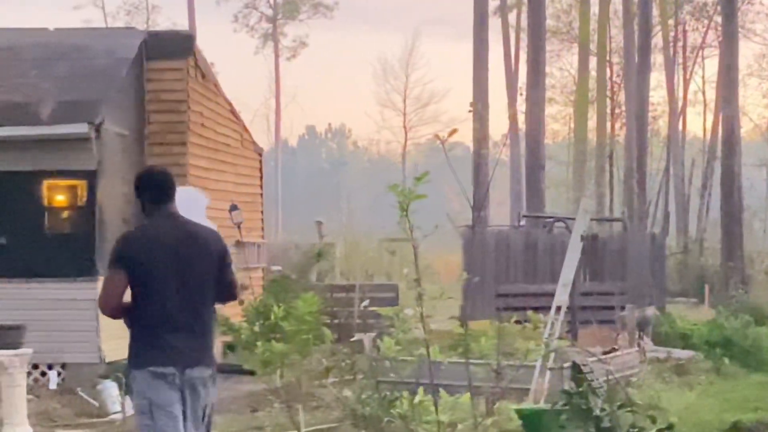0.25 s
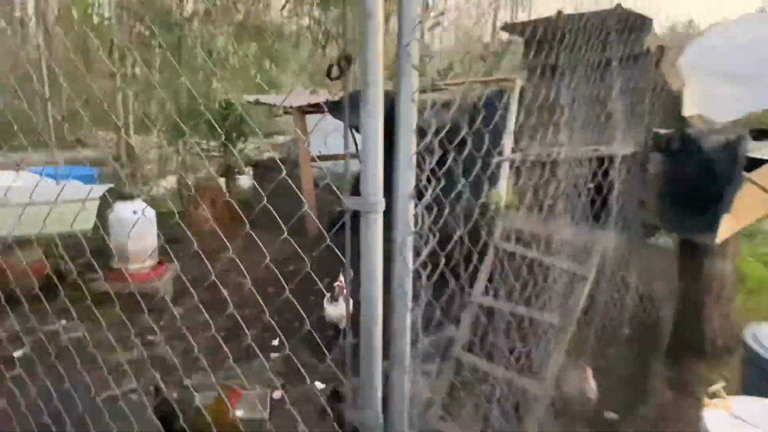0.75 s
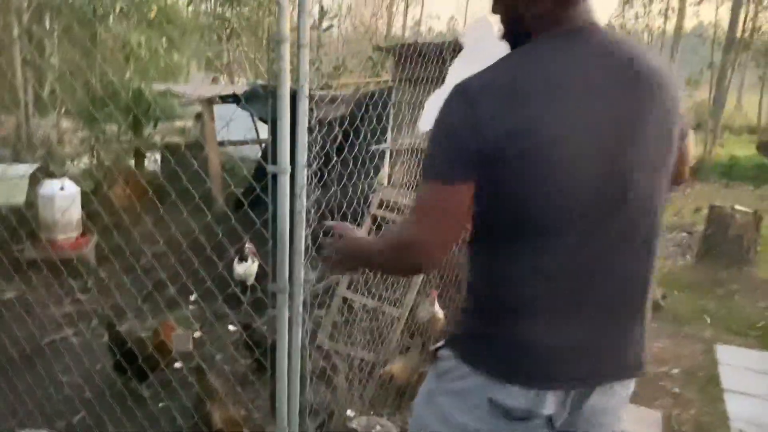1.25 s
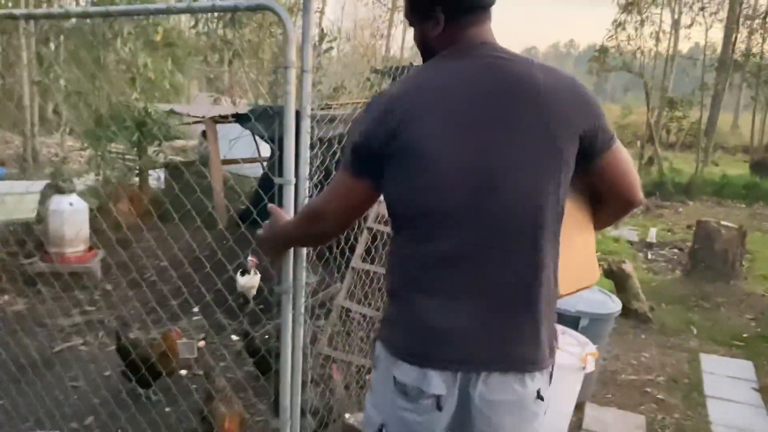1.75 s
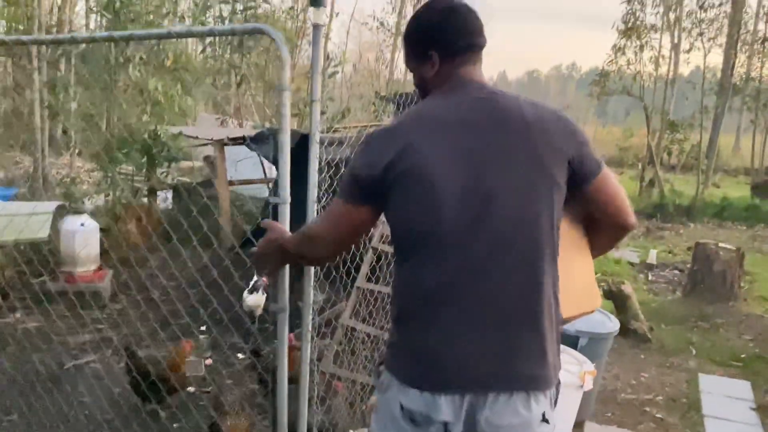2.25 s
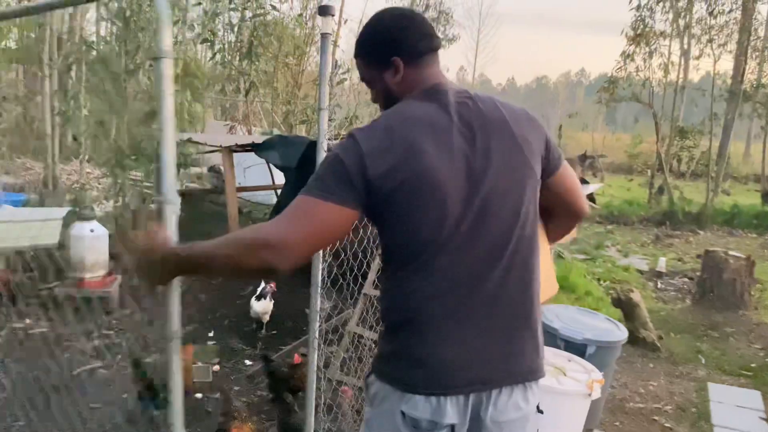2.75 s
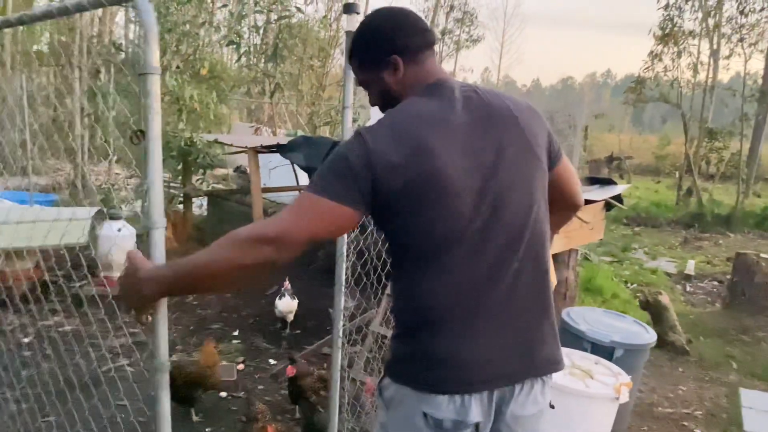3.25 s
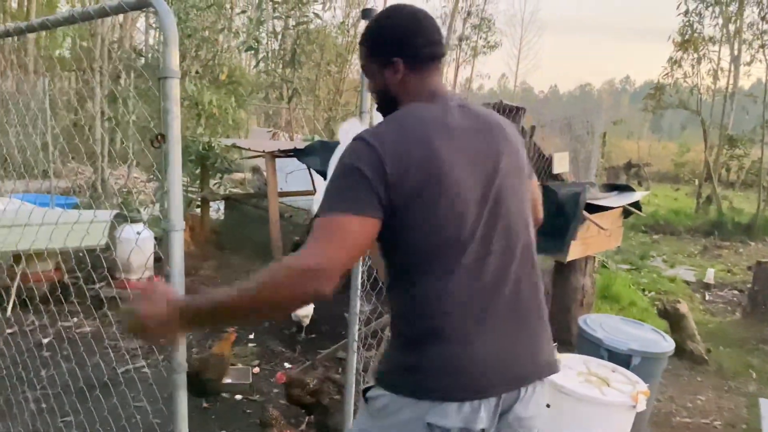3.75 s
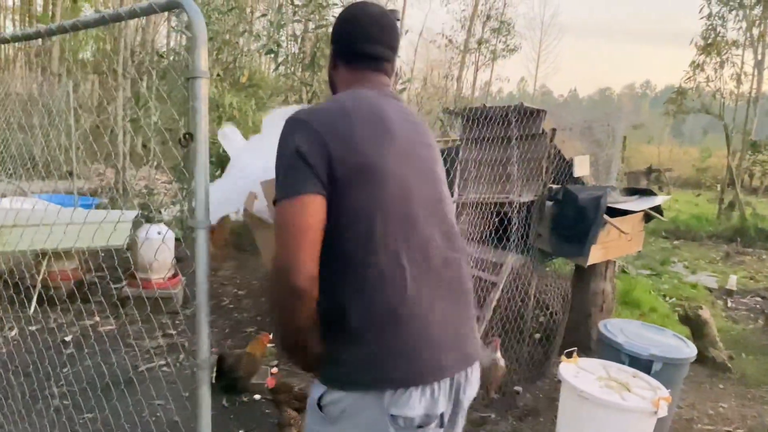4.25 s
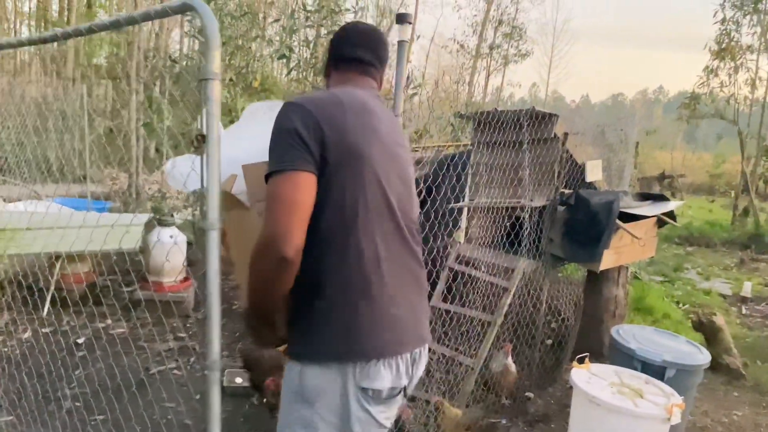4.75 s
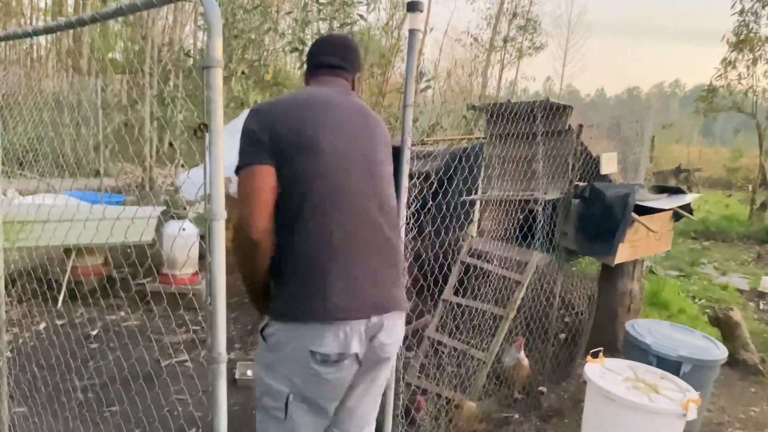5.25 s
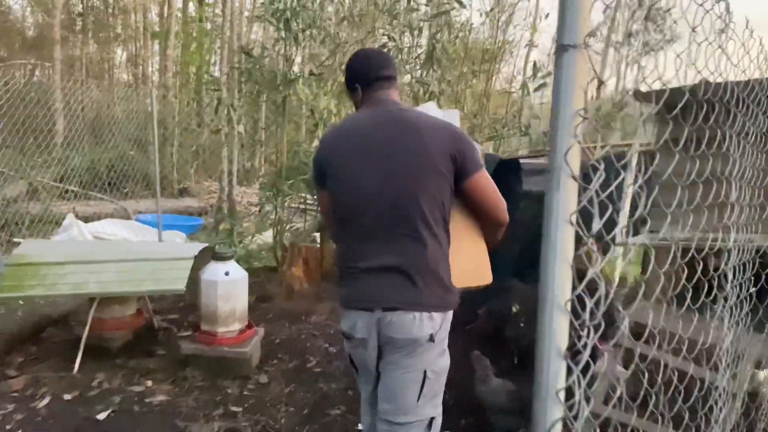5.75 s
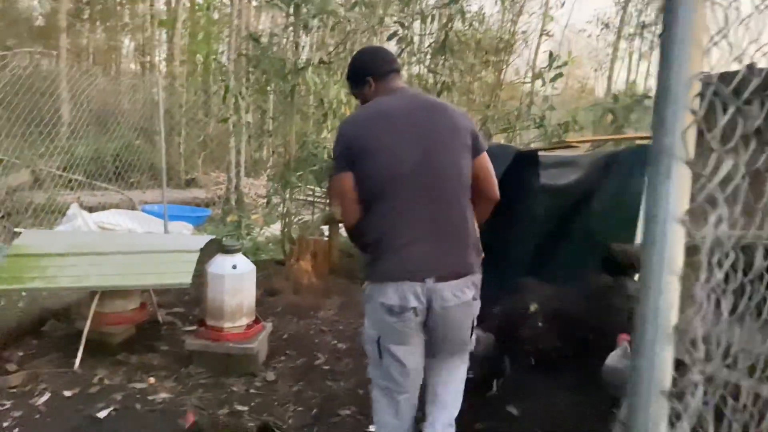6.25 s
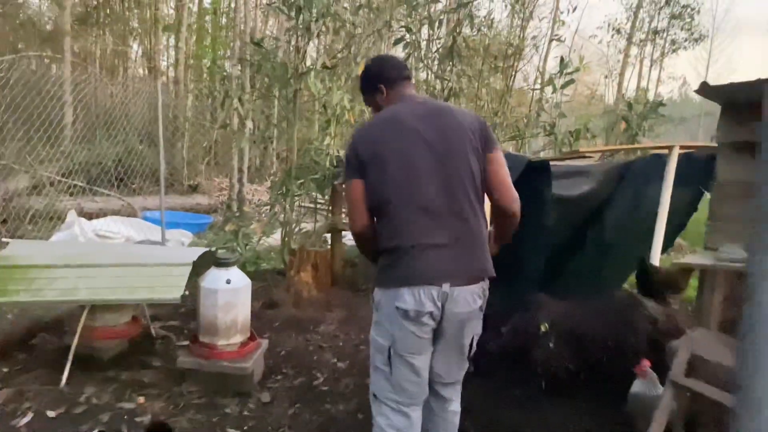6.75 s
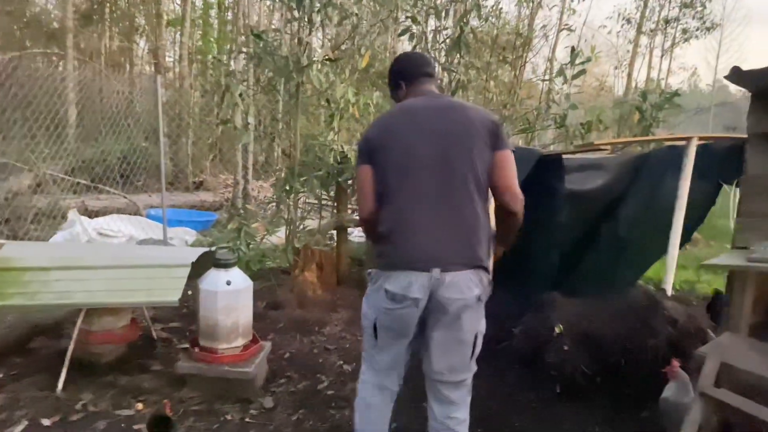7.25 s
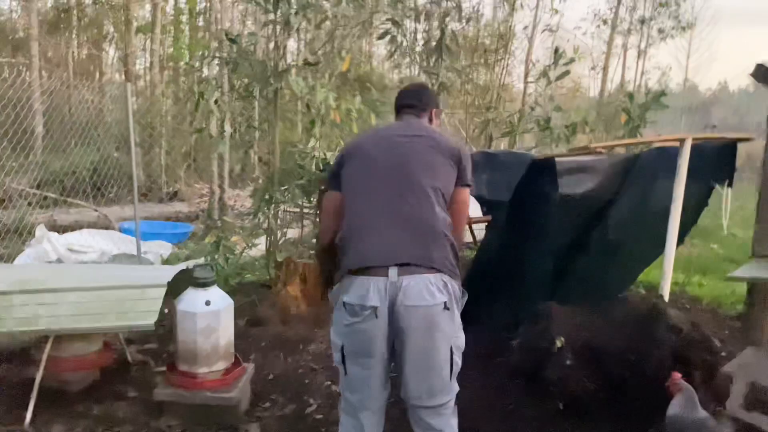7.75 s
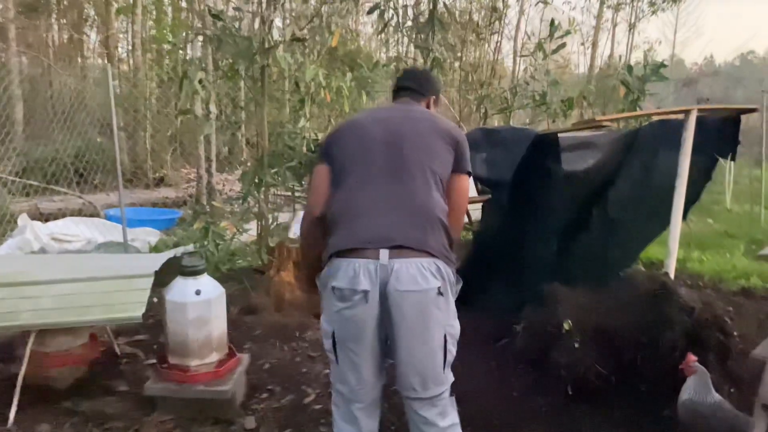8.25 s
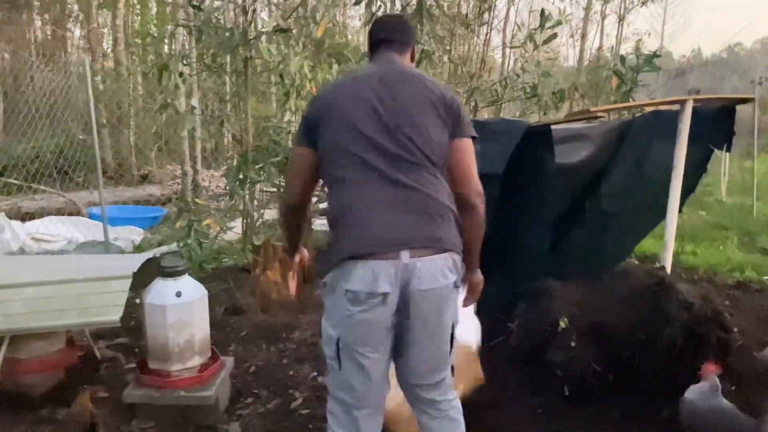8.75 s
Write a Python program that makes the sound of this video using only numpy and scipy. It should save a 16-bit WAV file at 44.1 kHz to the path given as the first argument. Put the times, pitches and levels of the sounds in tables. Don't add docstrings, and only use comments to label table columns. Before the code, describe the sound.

Hens give low clucks and drawn-out rising moans in an outdoor run while plastic crinkles, wire ticks, a bird whistles and a box thumps down.

```python
import sys
import numpy as np
from scipy import signal
from scipy.fft import rfft, irfft
from scipy.io import wavfile
from scipy.ndimage import uniform_filter1d

SR = 44100
rng = np.random.default_rng(int(sys.argv[2]) if len(sys.argv) > 2 else 0)


def elevation(decibels):
    levels = np.asarray(decibels, float)
    return 10 ** (levels / 20)


def put_to_file(sound):
    columns = np.atleast_2d(sound).T
    safe = np.clip(columns, -1, 1)
    whole_steps = np.round(safe * 32767)
    wavfile.write(sys.argv[1], SR, whole_steps.astype(np.int16))


N = 396900
TIME = np.arange(N) / SR

# from t/s, traffic level/dB, air level/dB, insect level/dB
SPOTS = [
    (0, -52, -62, -66.5),
    (.4, -66, -60, -73),
    (1.15, -51, -61, -72),
    (5.457, -50, -59.5, -72),
]
# t/s, level/dB
MOTION = [(0, -73), (.3, -79.5), (1.1, -76), (2.1, -73), (2.7, -72), (3.1, -65), (3.9, -67.5), (4.64, -72),
          (5.3, -68.5), (5.75, -69), (6.4, -65), (7.2, -70), (7.9, -69.5), (9, -67)]


def rms_one(x):
    return x / np.sqrt(np.mean(x ** 2) + 1e-20)


def in_time(rows):
    s, *columns = np.transpose(rows)
    return [np.interp(TIME, s, c) for c in columns]


def at_hz(points, hz):
    points = np.array(points)
    return np.interp(np.log(hz), np.log(points[:, 0]), points[:, 1])


def drift(rate_hz):
    r = np.exp(-80 * np.pi * rate_hz / SR)
    white = rng.standard_normal(N // 40 + 2002)
    slow = rms_one(signal.lfilter([1], [1, -2 * r, r * r], white)[2000:])
    return np.interp(np.arange(N) / 40, np.arange(len(slow)), slow)


def gate(start, end, edge):
    return np.sin(np.pi / 2 * np.clip(np.minimum(TIME - start, end - TIME) / edge + .5, 0, 1)) ** 2


def bandpass(x, band_hz):
    return signal.sosfilt(signal.butter(2, band_hz, "band", fs=SR, output="sos"), x)


def ring(clicks, hz, t60):
    r, w = elevation(-60 / (t60 * SR)), 2 * np.pi * hz / SR
    return signal.lfilter([0, np.sin(w)], [1, -2 * r * np.cos(w), r * r], clicks + 1e-18)


def place(x, pan_db, lead):
    left = np.interp(np.arange(N) + lead, np.arange(N), x)
    return np.array([left * elevation(pan_db / 2), x * elevation(-pan_db / 2)])


def banded(white, spectrum, patchy_db, tilt=None):
    # f/Hz, likeness [0-1]
    likeness = [(30, 0.71), (70, 0.97), (300, 0.52), (700, 0.36), (2500, 0.4), (4500, 0.45), (6500, 0.75),
                (9000, 0.9)]
    bottom, top = spectrum[0][0], spectrum[-1][0]
    edges = np.geomspace(bottom, top, 2 + int(2 * np.log2(top / bottom)))
    out, power = 0, 0
    for k, (low, high) in enumerate(zip(edges, edges[1:])):
        mid, side = bandpass(white[k % 2], [low, high])
        hz = np.sqrt(low * high)
        alike = np.clip(at_hz(likeness, hz), -1, 1)
        stereo = np.sqrt(1 + alike) * mid + np.sqrt(1 - alike) * side * [[1], [-1]]
        band = elevation(at_hz(spectrum, hz) + patchy_db * drift(12)) * stereo
        power += np.mean(band ** 2)
        out = out + band * (elevation(tilt(hz)) if tilt else 1)
    return out / np.sqrt(power)


def hens():
    # t/s, pitch f/Hz, effort level/dB, beak opening [0-1]
    clucks = [
        [(0.76, 900, -63, .3), (0.823, 942, -68.5, .34), (0.875, 922, -71, .33)],
        [(0.965, 340.4, -63, .08), (1.046, 317.6, -52, .35), (1.12, 309.5, -62, .35)],
        [(1.26, 341, -75, .1), (1.36, 384.2, -77, .17)],
        [(5.463, 1020, -80, .45), (5.48, 1030, -65, .45), (5.553, 1055, -65, .45)],
        [(7.09, 314.8, -77, .35), (7.12, 320.5, -52, .36), (7.135, 320.4, -70, .3)],
        [(8.07, 283.8, -61, .25), (8.152, 276.7, -60, .24), (8.18, 271.3, -65, .4)],
    ]
    drawls = [
        [(1.41, 696, -72, .35), (1.438, 681, -64, .53), (1.562, 720, -56, .72), (1.82, 743, -52, .78),
         (1.85, 721, -54, .85), (2.13, 765.5, -48.5, .92), (2.157, 654, -57, .72)],
        [(7.23, 314.8, -60, .1), (7.239, 316, -61, .2), (7.275, 379.3, -58.5, .24), (7.559, 386.3, -57.5, .21),
         (7.603, 400, -57, .2), (7.915, 410, -57, .22), (7.94, 400, -61, .18)],
    ]
    first_moan = [
        [(3.465, 321, -60, .36), (3.5, 330, -58, .36), (3.53, 356, -64, .1), (3.6, 372, -63, .12),
         (3.645, 412, -56, .2), (3.7, 414, -55, .2), (3.75, 390, -58, .12), (3.86, 379, -59, .15),
         (3.935, 366, -58, .32)],
        [(3.935, 370, -58, .33), (4.06, 405, -54, .41), (4.13, 393, -53, .4), (4.2, 386, -54, .4),
         (4.297, 410, -54, .43), (4.405, 396, -53.5, .41), (4.42, 424, -51, .45), (4.46, 422, -51, .45),
         (4.495, 440, -50, .2)],
    ]
    last_moan = [
        (8.28, 280.4, -66, 1),
        (8.34, 297, -68, .1),
        (8.4, 316.5, -60, .17),
        (8.46, 340, -60, .22),
        (8.5, 311, -60, .17),
        (8.57, 360, -58, .45),
        (8.582, 402, -57, .4),
        (8.615, 398, -56, .4),
        (8.64, 320, -57, .4),
    ]
    # L-R level/dB, left lead/samples, tremble share [0-1], loss per harmonic/dB, windpipe width f/Hz
    places = [(4, -14, 0.0079, 15, 200), (4.5, 6.5, 0.017, 6.5, 150), (-3, 4, .012, 6, 200),
              (-7.5, -7.6, 0.022, 15, 200), (-4, 8.5, .02, 4.5, 150), (4, 2, 0.0206, 9, 120),
              (-4, -3.4, .0075, 16, 270), (2.5, 1.5, .008, 4, 220), (1.1, -.6, 0.012, 7, 210),
              (1.1, -.6, 0.017, 4.5, 230), (-4.5, -15, .026, 3, 250)]
    # start t/s, end t/s, f/Hz, level/dB
    flips = [(4.07, 4.107, 980, -44.5), (4.278, 4.292, 906, -42.5), (4.467, 4.51, 1019, -39),
             (7.611, 7.64, 952, -46), (7.689, 7.706, 933, -43.5), (7.736, 7.746, 855, -45),
             (7.755, 7.799, 940, -40), (7.811, 7.844, 961, -39), (7.857, 7.87, 929, -39),
             (7.878, 7.893, 960, -35.5), (7.91, 7.92, 957, -39)]
    rasp_hz = [880, 1020]
    pipe_shut_hz, pipe_open_hz, pipe_lift_db = 600, 1600, 20
    fourth_db, fifth_db = -12, -22
    rasp_db = 36
    port_lead = 4

    flipped, flip_hz, flip_gain = np.zeros((3, N))
    for start, end, hz, level_db in flips:
        share = gate(start, end, .01)
        flipped += share
        flip_hz += share * hz / 2
        flip_gain += share * elevation(level_db)

    out = np.zeros((2, N))
    tremble = drift(29) + 0.745 * drift(136)
    flutter = [elevation((.8 + .7 * k) * drift(40)) for k in range(4)]
    rasp = rms_one(bandpass(rng.standard_normal(N), rasp_hz))
    calls = clucks + drawls + first_moan + [last_moan]
    for call, (pan_db, lead, unsteady, loss_db, width_hz) in zip(calls, places):
        pitch_hz, effort_db, opening = in_time(call)
        pipe_hz = pipe_shut_hz + opening * (pipe_open_hz - pipe_shut_hz)
        sung_hz = (pitch_hz * (1 - flipped) + flip_hz) * (1 + unsteady * tremble)
        phase = 2 * np.pi * np.cumsum(sung_hz) / SR
        gains = []
        for k, flip_loss in enumerate([.78, 1, .87, .87]):
            lift_db = pipe_lift_db / (1 + (((k + 1) * pitch_hz - pipe_hz) / width_hz) ** 2)
            gains.append(elevation(effort_db - k * loss_db + lift_db) * (1 - flip_loss * flipped))
        gains[1] = gains[1] + flip_gain
        gains[3] = gains[3] * elevation(fourth_db)
        voice = sum(g * flutter[k] * np.sin((k + 1) * phase) for k, g in enumerate(gains))
        voice += gains[2] * elevation(fifth_db) * np.sin(5 * phase)
        voice += elevation(effort_db - loss_db + rasp_db) * unsteady * rasp
        breath = gate(call[0][0], call[-1][0], 0.011)
        out += place(np.sqrt(2) * voice * breath, pan_db, lead + port_lead)
    return out


def box_drop():
    # t/s, level/dB
    hits = [
        (8.7755, -37),
        (8.779, -36),
        (8.782, -32),
        (8.7855, -20.5),
        (8.7893, -22),
        (8.7928, -21),
        (8.797, -25.5),
        (8.804, -35),
    ]
    # f/Hz, level/dB, t60/s
    modes = [(228, -2, .1), (380, -1, 0.06), (520, -15, 0.04), (740, 1, 0.02), (980, 1, 0.012),
             (1300, -5, 0.018), (2000, -4, 0.011), (2580, -4, 0.012), (3200, -9, .01)]
    # t/s, f/Hz, level/dB, t60/s
    thumps = [
        (5.134, 193, -35.5, 0.044),
        (1.36, 245, -37.5, 0.044),
        (8.789, 61, -15, 0.13),
        (8.801, 105, -19, 0.08),
        (8.7915, 385, -21, 0.07),
        (8.795, 183, -16, 0.04),
    ]
    at = [round(s * SR) for s, db in hits]
    out = np.zeros(N)
    for hz, level_db, t60 in modes:
        clicks = np.zeros(N)
        clicks[at] = elevation(np.array(hits)[:, 1] + level_db + rng.normal(0, 3, len(at)))
        out += ring(clicks, hz, t60)
    for s, hz, level_db, t60 in thumps:
        out += ring(elevation(level_db) * (np.arange(N) == round(s * SR)), hz, t60)
    fade_db = -20.5 - 60 * np.clip(TIME - 8.79, 0, 1) / .12
    crunch = rng.standard_normal(N) * gate(8.776, 9.5, 0.0084) * elevation(fade_db)
    return out + signal.lfilter([.2], [1, -.88], crunch)


def handling():
    # t/s, peak level/dB, time to rise 10 dB/s, time to fall 10 dB/s, body level/dB
    crumples = [(.63, -61, .02, .025, -4), (.82, -60.5, .02, .05, -1.5), (1.2, -62, .07, .2, .6),
                (1.55, -53.5, .014, .27, -6), (2.23, -63, .09, .16, -6), (2.38, -58, .025, .12, -6),
                (2.89, -59, .12, .2, -8), (3.03, -59.5, .2, .17, -2.5), (3.18, -58, .022, .055, -7),
                (3.31, -56.5, .09, .24, -1.5), (4.11, -58.5, .05, .08, 2.5),
                (5.685, -45.5, .008, .018, 5.5), (6.26, -63, .3, .3, -3.5), (6.54, -62, .1, .07, -11.5),
                (6.67, -53, .05, .045, -8.5), (6.99, -59, .14, .17, -1.5), (7.3, -54, .04, .045, -2),
                (7.39, -51.5, .035, .105, -5.5), (8.5, -61, .18, .06, 1.5), (8.8, -39, .013, .035, 1.5),
                (8.86, -49, .04, .12, -8)]
    cloth_body_db = 1.0
    power = elevation(2 * in_time(MOTION)[0])
    body = power * cloth_body_db
    for s, peak_db, rise_s, fall_s, body_db in crumples:
        crumple = elevation(2 * peak_db - 20 * np.maximum((s - TIME) / rise_s, (TIME - s) / fall_s))
        power = power + crumple
        body = body + crumple * body_db
    return 10 * np.log10(power), body / power


def rustle():
    # f/Hz, level/dB per Hz
    bag = [(530, -46), (900, -11.5), (1720, -14.5), (2340, -13), (3250, -12.5), (4500, -12.5), (6300, -17),
           (8800, -19.5), (12200, -22.5), (20000, -17.5)]
    level_db, body_db = handling()
    grains_per_s = 500 * elevation(6.0 * drift(25))
    strength = elevation(4.5 * np.minimum(rng.exponential(1, N), 5))
    grains = (rng.random(N) < grains_per_s / SR) * strength
    crinkle = (1 + 3.8 * uniform_filter1d(grains, size=16)) * elevation(1.0 * drift(30))
    white = rng.standard_normal((2, 2, N)) * crinkle

    def tilt(hz):
        return (body_db - body_db.mean()) * np.clip(np.log2(4500 / hz), 0, 1)

    out = elevation(level_db + 8.6) * banded(white, bag, 2.32, tilt)
    return signal.sosfilt(signal.cheby2(22, 60, 15950, fs=SR, output="sos"), out)


def contacts():
    # t/s, peak level/dB, f/Hz, t60/s
    ticks = [(0.616, -47, 1930, .004), (.6953, -55, 2450, .004), (0.8155, -42, 1240, .004),
             (1.3249, -49, 1140, .004), (1.4911, -43, 2900, .004), (1.5549, -42, 7440, .004),
             (2.2287, -49, 6090, .004), (2.368, -42, 1810, .004), (2.4119, -44, 6230, .004),
             (2.828, -43.5, 2900, .004), (3.1822, -44, 1680, .004), (3.7194, -44, 1140, .004),
             (3.8646, -44, 1290, .004), (4.603, -46, 2400, .004), (4.705, -47, 1500, .008),
             (4.8769, -44, 1900, .005), (4.9975, -44, 2400, .02), (5.1316, -35, 2520, .008),
             (5.1319, -40, 4700, .006), (5.144, -47, 3650, .025), (5.3544, -42, 2010, .012),
             (5.5518, -46, 6500, .004), (5.5902, -38, 3250, .015), (5.5902, -36, 1780, .012),
             (5.6765, -31, 3400, .01), (5.696, -36, 6200, .008), (5.797, -46, 1150, .02),
             (6.215, -34, 1300, .004), (2.914, -41, 1170, .03), (2.869, -45, 1030, .02),
             (3.3, -44, 1300, .02), (6.782, -44, 1310, .003), (6.8192, -17, 1250, .006),
             (7.2644, -41, 7090, .005), (7.2873, -43, 3500, .004), (7.3706, -38, 4771, .004),
             (7.4664, -41, 10500, .004), (7.4939, -47, 6000, .004), (8.4994, -39, 2760, .004)]
    # t/s, peak level/dB, f/Hz, t60/s
    steps = [(0.53, -54, 127, 0.069), (0.614, -45, 380, 0.027), (0.757, -41, 280, 0.029),
             (0.811, -41, 900, 0.04), (1.176, -39.5, 1100, 0.034), (1.214, -43, 1000, 0.047),
             (3.0, -38, 140, 0.06), (4.105, -35, 254, 0.063), (5.682, -30.5, 800, 0.04),
             (6.212, -39, 520, 0.02), (8.689, -40.5, 264, 0.04)]
    crack_db, tail_db = -4, -24
    out = np.zeros((2, N))
    t = np.arange(SR // 5) / SR
    for s, peak_db, hz, t60 in ticks:
        burst, scrape = rng.standard_normal((2, len(t)))
        crack = np.diff(burst, prepend=0) * elevation(-60 * t / .006)
        tail = np.diff(scrape, prepend=0) * elevation(-60 * t / .05)
        blow = burst * elevation(-60 * t / .003) + 4 * (np.arange(len(t)) == 8)
        body = ring(blow, hz, max(t60, .002))
        tick = body / np.abs(body).max() + elevation(crack_db) * crack / 3 + elevation(tail_db) * tail
        i = int(s * SR)
        out[:, i:i + len(t)] += elevation(peak_db) * tick * elevation([[-1.2], [1.2]])
    for s, peak_db, hz, t60 in steps:
        press = elevation(-60 * t / 0.065) * np.clip(t / 0.0026, 0, 1)
        puff = signal.lfilter([1], [1, -.9], rng.standard_normal(len(t)) * press)
        bump = rms_one(ring(puff, hz, max(t60, .005))) + .5 * rms_one(puff)
        i = int(s * SR)
        out[:, i:i + len(t)] += elevation(peak_db) * bump / np.abs(bump).max()
    return out


def scuffs():
    strokes = [
        (1.55, 1.9, 2410, 500, -65),
        (2.888, 2.97, 1080, 600, -56),
        (3.262, 3.334, 1280, 700, -60),
        (5.295, 5.43, 600, 920, -58.5),
        (5.41, 5.47, 720, 600, -47),
        (6.31, 6.478, 2510, 444, -61),
        (8.0, 8.246, 2527, 500, -70),
        (8.56, 8.625, 1000, 400, -55),
    ]
    out, lumpy = 0, rng.standard_normal((2, N)) * elevation(3 * drift(60))
    for start, end, hz, width_hz, level_db in strokes:
        swell = lumpy * gate(start, end, 0.062) + 1e-18
        noise = bandpass(swell, [hz - width_hz / 2, hz + width_hz / 2])
        out = out + elevation(level_db) * np.sqrt(SR / 2 / width_hz) * noise
    return out + 0.57 * out[::-1]


def songbird():
    # delay t/s, length/s, start f/Hz, end f/Hz, level/dB
    phrase = [
        (0, 0.02396, 3416, 3150, -7),
        (.032, .028, 2790, 2760, 0),
        (.085, .07, 3438, 3700, -6),
        (.166, .13, 4250, 4700, -3),
    ]
    # t/s, level/dB, pace [1 = normal], top note level/dB as the bird turns its head
    songs = [
        (.335, -55, 0.4, -2),
        (1.071, -64, 0.26, 8),
        (3.386, -60, 0.64, 8.5),
        (4.745, -58, 0.92, 1.5),
        (5.659, -56, 1.01, 2.5),
        (6.878, -52.5, 1.08, -2),
        (8.335, -55.5, 1.07, 1.5),
    ]
    out = np.zeros(N)
    for s, song_db, pace, top_db in songs:
        for delay, length, start_hz, end_hz, note_db in phrase:
            a, b = rng.standard_normal(2)
            t = np.arange(int(length * np.sqrt(pace) * SR)) / SR
            glide_hz = end_hz + (start_hz - end_hz) * (1 - t / t[-1]) ** 2.6
            warble = .007 * np.sin(2 * np.pi * 70 * t + b)
            hz = glide_hz * (1 + .006 * a + warble)
            level_db = song_db + note_db + top_db * (end_hz > 4000) + 1.5 * b
            whistle = np.hanning(len(t)) ** .4 * np.sin(2 * np.pi * np.cumsum(hz) / SR)
            i = int((s + delay * pace) * SR)
            out[i:i + len(t)] += elevation(level_db) * whistle
    return out * elevation(3.5 * drift(90) - 1)


def trees(x, t60, wet_db):
    t = np.arange(SR // 2) / SR
    tail = rng.standard_normal((2, len(t))) * elevation(-60 * t / t60) * np.clip(t / 0.033, 0, 1)
    tail = tail / np.sqrt(np.sum(tail[0] ** 2))
    return elevation(wet_db) * signal.fftconvolve(x[None], tail, axes=1)[:, :N]


def insects(level_db):
    center_hz, width_hz = 4700, 500
    band = [center_hz - width_hz / 2, center_hz + width_hz / 2]
    hiss = rms_one(bandpass(rng.standard_normal((2, N)), band))
    return elevation(level_db + 1.35 * drift(1.5)) * hiss


def engine():
    # t/s, f/Hz, level/dB
    hum = [(5.47, 66, -39), (6.12, 67.33, -38), (6.46, 73.64, -42.5), (7.27, 73.26, -40.5), (7.5, 67, -39),
           (8.09, 63.9, -43.5), (8.21, 60.53, -53), (8.55, 74.5, -48), (9.1, 71, -51)]
    overtone_ratio, overtone_db = 1.6, -61
    hz, level_db = in_time(hum)
    phase = 2 * np.pi * np.cumsum(hz) / SR
    orders = elevation(level_db + 0.4 * drift(11)) * np.sin(phase)
    orders += elevation(overtone_db + 0.4 * drift(11)) * np.sin(overtone_ratio * phase)
    return np.sqrt(2) * orders * gate(hum[0][0], hum[-1][0], .04)


def traffic_and_air(traffic_db, air_db):
    # f/Hz, level/dB per Hz
    traffic = [(12, -52), (20, -26.5), (46, -1.5), (65, 5), (79, 0), (108, -14.5), (135, -16.5), (200, -14),
               (260, -95), (440, -120)]
    # f/Hz, level/dB per Hz
    air = [(76, 3), (130, 4), (183, -5), (264, -1.5), (741, -9.5), (1190, -9.5), (1350, -29), (2200, -15),
           (2860, -34), (4840, -120)]
    motion_db, = in_time(MOTION)
    air_db = air_db + .85 * (motion_db - motion_db.mean())
    white = rng.standard_normal((2, 2, N))
    rumble = elevation(traffic_db) * banded(white, traffic, 1.0)
    return rumble + elevation(air_db + 2.5) * banded(white[::-1], air, 2.5) * elevation([[1.5], [-1.5]])


def scene():
    # f/Hz, cycles by which left leads
    port_turns = [(0, 0), (5300, .5), (6900, 1), (9000, 1.5), (11100, 2), (13200, 2.5), (15300, 3),
                  (22050, 4.5)]
    spot = np.searchsorted(np.array(SPOTS)[1:, 0], TIME)
    traffic_db, air_db, insect_db = uniform_filter1d(np.array(SPOTS)[spot, 1:].T, size=2000)
    voices, box, bird = hens(), box_drop(), songbird()
    echoes = trees(bird, .6, 1.0) * elevation(3 * drift(25) - 12 * (spot < 2))
    around = rustle() + contacts() + scuffs()
    around += insects(insect_db) + engine() + traffic_and_air(traffic_db, air_db)
    turns = np.interp(np.arange(N // 2 + 1) * SR / N, *np.transpose(port_turns))
    around[0] = irfft(rfft(around[0]) * np.exp(2j * np.pi * turns), N)
    near = voices + trees(voices[0], 0.071, -15.5) + place(box, -.8, 2.5) + trees(box, 0.16, -15.5)
    return near + place(bird, -9.0, .1) + echoes + around


def band_limit(x):
    return signal.sosfilt(signal.butter(12, 16960, fs=SR, output="sos"), x)


def record(dry):
    dropouts = [
        .3435,
        .3665,
        5.457,
    ]
    # low f/Hz, high f/Hz
    gaps_hz = [
        [(8700, 9550), (12750, 13750)],
        [(10450, 11650), (14600, 16900)],
    ]
    gap_opens_db = 5.0
    dry = dry * (1 - .998 * sum(gate(s - .0055, s + .0055, .004) for s in dropouts))
    pair = [(dry[0] + dry[1]) / 2, (dry[0] - dry[1]) / 2]
    bright = np.diff(dry[1], 3, prepend=[0, 0, 0]) ** 2 + 1e-14
    rise_db = 10 * np.log10(uniform_filter1d(bright, size=130) / uniform_filter1d(bright, size=4000))
    opened = np.clip(20 * uniform_filter1d(1. * (rise_db > gap_opens_db), size=900), 0, 1)
    for k, gaps in enumerate(gaps_hz):
        for gap_hz in gaps:
            rest = signal.sosfiltfilt(signal.butter(4, gap_hz, "bandstop", fs=SR, output="sos"), pair[k])
            pair[k] = rest + (pair[k] - rest) * opened
    stereo = [pair[0] + pair[1], pair[0] - pair[1]]
    mix = signal.sosfilt(signal.butter(4, 42, "high", fs=SR, output="sos"), stereo)
    mix = signal.sosfilt(signal.cheby2(12, 70, 16950, fs=SR, output="sos"), mix)
    return band_limit(mix)


dry = scene()
out = record(dry)
put_to_file(out)
```